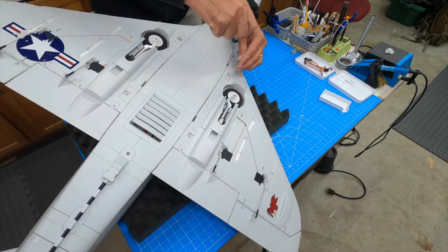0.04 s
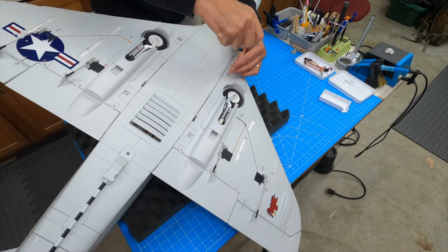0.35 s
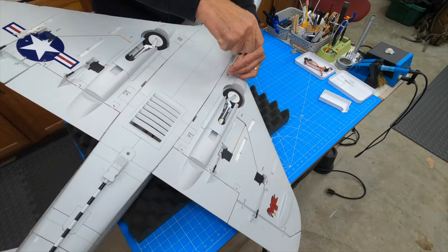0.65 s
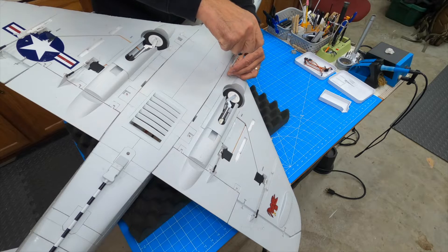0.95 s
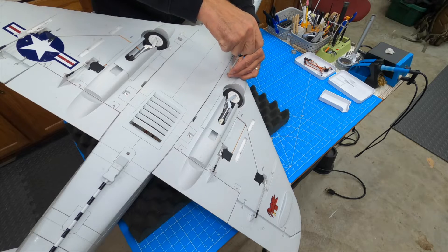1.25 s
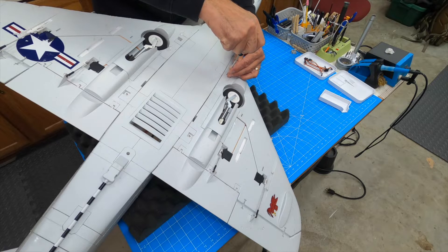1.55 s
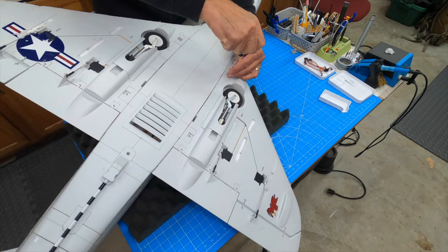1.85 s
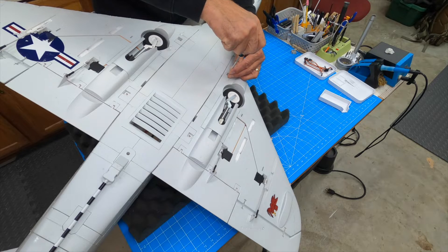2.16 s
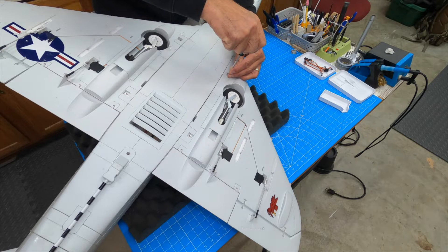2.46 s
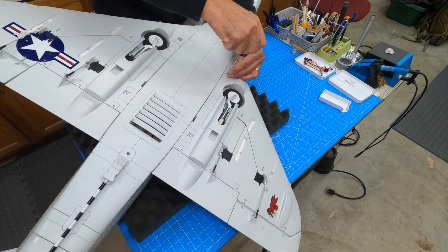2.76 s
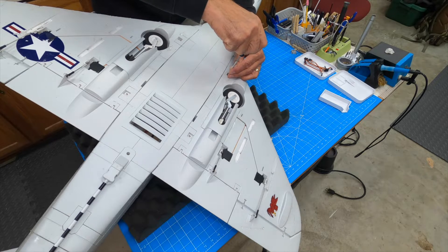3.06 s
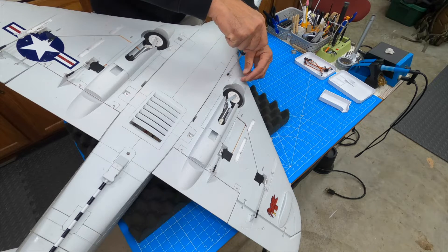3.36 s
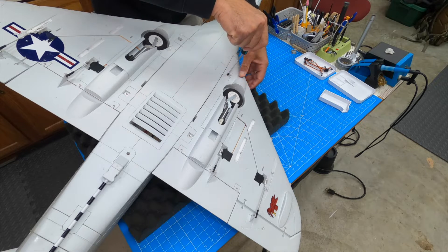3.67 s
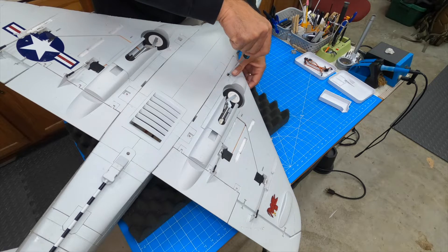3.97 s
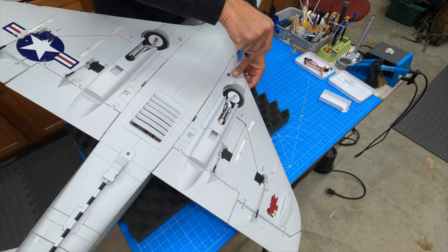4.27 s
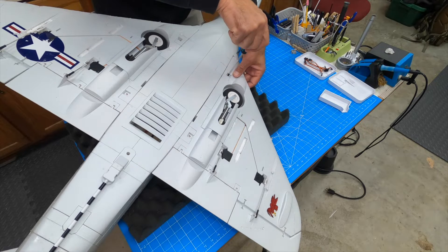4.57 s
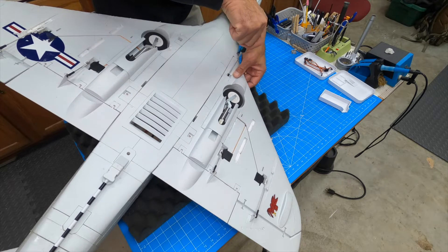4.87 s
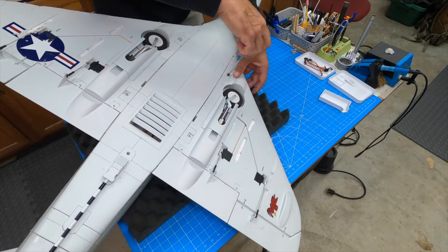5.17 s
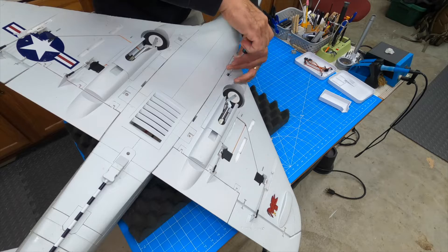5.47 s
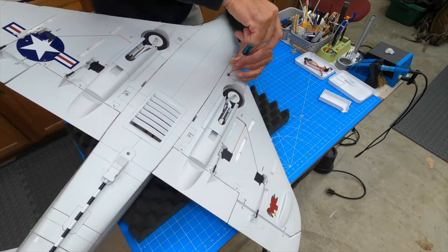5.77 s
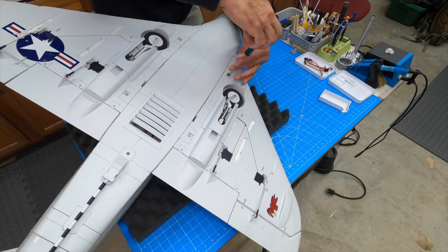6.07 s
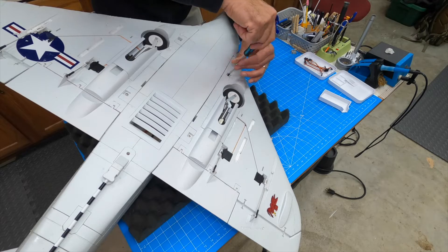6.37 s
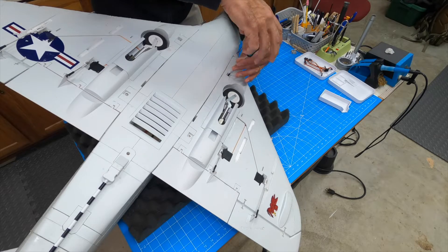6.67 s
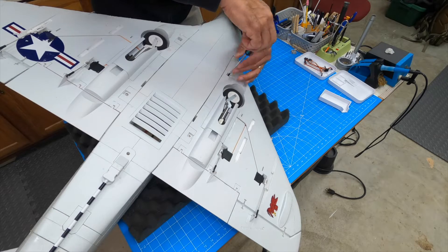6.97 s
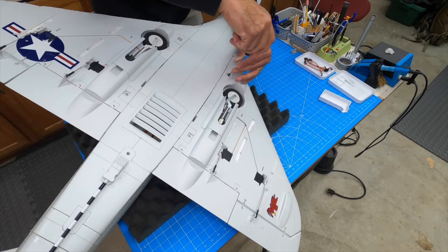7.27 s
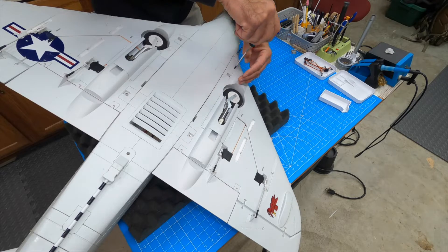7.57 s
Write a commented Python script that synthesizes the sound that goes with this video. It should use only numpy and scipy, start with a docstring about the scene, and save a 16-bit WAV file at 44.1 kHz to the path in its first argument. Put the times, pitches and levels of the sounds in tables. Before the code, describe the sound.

A small screwdriver works a screw into the hollow wing of a foam model aircraft, heard close in a quiet workshop with a faint low rumble. After a soft bump, the tip clicks into the screw head at about 0.8 seconds. Light, irregular ticks, small hollow knocks and faint grinding follow until about 3.2 seconds as the thread sticks and slips. Fingers slide faintly over the handle. Just after 4 seconds come sharper clicks: the bit jumps with a brief metallic tick at 4.3, and the loudest knock, a bright snap, lands at 4.6. From 5 to 6.6 seconds there are only sparse soft ticks, rubs and tiny squeaks. A quick cluster of creaky clicks and knocks comes between 6.9 and 7.2 seconds, then a few lighter ticks and a short scrape of the tip around 7.5.

```python
"""Screwdriver on a foam wing

A small screwdriver works a screw into the wing of a foam model aircraft in a quiet workshop.
The tip clicks into the head, the thread sticks and lets go: each knocks the hollow wing, which rings
briefly; harder contact, brighter knock. The thread grinds in its plastic seat; once the bit jumps
and the steel shaft rings. Between turns the fingers slide over the handle for a new grip."""
import sys
import numpy as np
from scipy import signal
from scipy.fft import rfft, irfft, next_fast_len
from scipy.io import wavfile

SR = 44100
rng = np.random.default_rng(int(sys.argv[2]) if len(sys.argv) > 2 else 0)


def dump(signal):
    """Clip the signal to [-1, 1] and save it as 16-bit WAV at the path in sys.argv[1]."""
    limited = np.clip(np.atleast_2d(signal).T, -1, 1)
    pcm = np.round(limited * 32767).astype(np.int16)
    wavfile.write(sys.argv[1], SR, pcm)


N = 336042
TIME_S = np.arange(N) / SR
RING_SAMPLES, LEAD_SAMPLES = 12000, 1024

# thread slips: t/s, strength/dB, contact cut-off/Hz, relative seat knock/dB
SLIPS = [(1.409, -49, 1070.0, 5.5), (1.501, -49.5, 950, 3.5), (1.554, -50.5, 2200, -20),
         (1.666, -58.5, 880.0, 4.5), (1.773, -46.5, 526, 0.5), (2.169, -45.5, 2580, -9),
         (2.37, -44, 1070, -11), (2.573, -46.5, 3100, 2.5), (2.695, -53.5, 237, 8.5),
         (2.959, -44.5, 470.0, -2), (3.192, -37.5, 890, 15.5), (4.377, -24.5, 1160, 4.5),
         (4.589, -16, 4250, 9), (4.777, -52, 850, -0.0), (4.9, -62, 690.0, 9), (5.036, -52, 2270.0, 2.5),
         (5.569, -43.5, 841, -9.5), (6.371, -52.5, 1196, 17), (6.468, -48.5, 480.0, -11),
         (6.8988, -25, 1080, -8), (6.946, -39.5, 2180, 4), (6.969, -30.0, 780.0, -7.0),
         (6.996, -32.5, 1020.0, -2.5), (7.04, -33, 930.0, 2.5), (7.12, -25, 660.0, -17),
         (7.147, -36, 536, -12.0), (7.324, -43, 915, -2), (7.358, -44.5, 1810, 3),
         (7.433, -46.5, 1640.0, -3.5)]
# slip colour at hardest contact: f/Hz, gain/dB
SLIP_TONE = [(335, -0.5), (594, -5), (1095, -12.5), (2830, -12), (7070, -17.5)]
# tip drops into the screw head: t/s, strength/dB, contact cut-off/Hz
CLICKS = [(0.766, -30.0, 765), (0.91, -41.0, 2250), (1.231, -37, 2350), (1.361, -37, 574),
          (2.272, -37, 2880), (2.411, -38, 1910), (2.615, -39.0, 1230), (3.021, -29.5, 1950),
          (4.102, -31.5, 2120), (4.2775, -29, 4850), (6.63, -38, 940), (7.076, -24.5, 2260)]
# click colour at hardest contact: f/Hz, gain/dB
CLICK_TONE = [(335, 0.5), (594, -4.5), (1095, -6), (2830, -7), (7070, 1.5)]
# bit jumps in the head: t/s, strength/dB
CAM_OUTS = [(4.2768, -21), (4.2791, -26)]
# thread grinds in the plastic: t/s, strength/dB, sigma/s
GRINDS = [(1.165, -59, 0.023), (1.508, -52.5, 0.042), (1.825, -56.5, 0.095), (2.41, -41, 0.018),
          (3.178, -33, .002), (4.369, -31, 0.0049), (5.22, -64.5, 0.098), (6.359, -49, .017),
          (6.701, -57.5, 0.018), (6.832, -57, 0.054), (6.887, -43, 0.0054), (7.009, -38, 0.0066),
          (7.062, -41.5, 0.0043)]
# wing's thump, knock, clack, tick and snap bands: low/Hz, high/Hz
WING_BANDS_HZ = [(250, 450), (470, 750), (800, 1500), (2000, 4000), (5000, 10000)]
# hollow wing: f/Hz, level/dB, t60/s
WING_MODES = [(159, -7, 0.25), (248.5, -10, .15), (331.7, 7.5, 0.16), (389.5, 3.5, 0.14),
              (420.8, 3.5, 0.076), (468.2, -13.5, 0.22), (559.6, -0.5, 0.059), (603, -10, 0.079),
              (660, -5, .07), (764, -15, 0.12), (813.4, -18.5, 0.12), (935, -18, 0.13),
              (1008.7, -14.5, .11), (1039.5, -6.5, 0.11), (1091.6, -16, 0.078), (1219, -23.5, 0.055),
              (1358, -18, 0.082), (1954, -22.5, .1), (2140, -34, 0.11), (2415, -19, 0.094),
              (2640, -19.5, 0.071)]
# dense, quickly damped foam response: f/Hz, gain/dB
FOAM_TONE = [(60, -13), (140, -4.5), (235, -18.5), (350, 1.5), (600, -1), (780, -3), (1080, -2.5),
             (1350, -8), (1700, -11), (2450, -15.5), (3000, -18), (4500, -14), (6400, -13.5), (9000, -21),
             (15000, -31.5)]
# plastic seat, damped by the foam: f/Hz, level/dB, t60/s
SEAT_MODES = [(406.6, -0.5, 0.051), (556.4, -3, .05)]
# screw resonance, moving with its seat: t/s, f/Hz
SCREW_RESONANCE = [(0.9, 2400), (1.3, 2470), (4.4, 2630), (4.59, 4097), (5.1, 3397), (7.4, 3400)]
# shaft and screw: f/Hz, level/dB, t60/s
STEEL_MODES = [(760.5, -9.5, 0.13), (1220, -14, 0.14), (1955, -9, .05), (2080, -14, 0.031),
               (2391, 6, 0.026), (2678, -2.5, .012), (3900, -15.5, 0.052), (4694, -16.5, 0.03),
               (5930, -0.5, 0.017), (6540, -2.5, 0.026), (6420, -2, 0.0093), (7100, -7, 0.0081),
               (9090, -10.5, 0.013), (10240, -13, 0.0094), (11300, -10, .008)]
# fingers slide on the handle: t/s, strength/dB, sigma/s
RUBS = [(3.387, -71, 0.013), (3.465, -61.5, 0.011), (3.713, -64, 0.013), (4.049, -69, 0.049),
        (5.175, -66.5, 0.024), (5.215, -57, 0.013), (5.289, -62.5, 0.012), (5.714, -73, 0.047),
        (6.067, -71.5, .012), (6.361, -70, 0.027), (6.804, -77, 0.031)]
# fingers rub and tap on the handle, short rough scrapes and ticks: t/s, level/dB, sigma/s
SCRAPES = [(4.271, -60.5, 0.016), (4.507, -63.5, 0.044), (7.487, -51, 0.0071), (7.544, -47.5, 0.002),
           (7.564, -68.5, .031)]
# tip squeaks in the head: t/s, level/dB, sigma/s
SQUEAKS = [(6.061, -74, .02), (6.247, -77.5, 0.014), (6.569, -68.5, 0.0073), (6.606, -74, 0.017)]
# wing nudges the bench: t/s, level/dB, sigma/s, f/Hz
BUMPS = [(0.267, -51, 0.009, 92), (0.418, -56.5, 0.034, 100), (4.605, -40.5, .008, 55.17)]
# workshop reverberation: f/Hz, t60/s
ROOM_DECAY = [(150, 0.15), (500, 0.37), (1200, 0.19), (4000, 0.19), (12000, 0.17)]
# colour of the diffuse sound: f/Hz, gain/dB
ROOM_TONE = [(150, 4.5), (400, -3.5), (1100, 0), (2500, 3.5), (6000, -7.5), (12000, 3)]
# still workshop air: f/Hz, relative density/dB
AIR_SPECTRUM = [(13, -37), (22, -21.5), (146, -6), (240, -17.5), (316, -8.5), (490, -19), (532, -19.5),
                (645, -16.5), (849, -27), (1030, -25), (1120, -35.5), (1250, -26), (1350, -28.5),
                (3440, -34), (15600, -36)]
# distant motor: f/Hz, level/dB
MOTOR_HUM = [(149, -77), (542, -82.5)]


def slips(gain_db, top_db, seat_db=4.5, light_slip_db=-49.5, light_creep_db=4, creep_db_per_db=0.18):
    """The thread lets go and knocks its seat: light slips creep, strong ones break free at once."""
    tone_db = gain_db + at_hz(SLIP_TONE, band_centres_hz())
    blows = [(s, db, hz, light_creep_db - creep_db_per_db * (db - light_slip_db))
             for s, db, hz, _ in SLIPS]
    out = wing_blows(blows, tone_db, top_db, rolloff=3.23)
    knock = band(ringing(SEAT_MODES).sum(axis=0), low_hz=272, high_hz=1100)
    for s, db, _, knock_db in SLIPS:
        add(out, from_db(db + knock_db + seat_db) * knock, round(s * SR))
    return out


def clicks(gain_db, top_db, creep_db=-27, rolloff=5.57, shaft_db=5.5, shaft_onset_hz=3553, room_db=-5):
    """The tip lands on the screw with hardly any creep; hard contact also rings the shaft."""
    tone_db = gain_db + at_hz(CLICK_TONE, band_centres_hz())
    wing = wing_blows([(s, db, hz, creep_db) for s, db, hz in CLICKS], tone_db, top_db, rolloff)
    shaft, steel = np.zeros(N), ringing(STEEL_MODES)
    mode_signs = rng.choice([-1, 1], (len(CLICKS), len(STEEL_MODES)))
    for (s, db, contact_hz), signs in zip(CLICKS, mode_signs):
        loss_db = contact_loss_db(shaft_onset_hz, contact_hz, rolloff)
        ring = signal.sosfilt(signal.butter(1, contact_hz, fs=SR, output="sos"), signs @ steel)
        add(shaft, from_db(db + shaft_db - loss_db) * ring, round(s * SR))
    return wing + with_room(shaft, room_db)


def cam_out(room_db):
    """The bit jumps and strikes steel on steel; the shaft rings for an instant."""
    out = np.zeros(N)
    ring = rng.choice([-1, 1], len(STEEL_MODES)) @ ringing(STEEL_MODES)
    ring = with_room(ring, room_db)
    for s, db in CAM_OUTS:
        add(out, from_db(db) * ring, round(s * SR))
    return out


def grinding(creeps_per_s):
    """Under torque the thread creeps in many small uneven steps that shake the wing."""
    pressure = sum(from_db(db) * bell(TIME_S - s, sigma_s) for s, db, sigma_s in GRINDS)
    creeps = rms_one(creep_pulses(N, creeps_per_s))
    response = wing_response(ringing(WING_MODES, rise_s=0.0036), room_tails(1)[0], screw_hz=3420)
    response = colour(response, [(400, 1.5), (1000, 0.5), (2400, -6.5), (3500, -18), (7000, -36.5)])
    return signal.fftconvolve(creeps * pressure, energy_one(response))[:N]


def stick_slip(creep_db, creeps_per_s=1100, swell_s=0.0024, settle_s=0.0051):
    """Creeps swell as torque builds, the contact lets go, more creeps follow as it settles."""
    t = np.arange(-LEAD_SAMPLES, LEAD_SAMPLES) / SR
    envelope = np.exp(np.minimum(t / swell_s, -t / settle_s))
    creeps = energy_one(creep_pulses(len(t), creeps_per_s) * envelope)
    creeps = colour(creeps, [(600, 1), (2500, -2.5), (8000, -8.5)])
    release = signal.unit_impulse(len(t), LEAD_SAMPLES)
    return from_db(creep_db) * creeps + release


def creep_pulses(samples, creeps_per_s):
    """Tiny friction steps, random in time and size."""
    return rng.standard_normal(samples) * (rng.random(samples) < creeps_per_s / SR)


def contact_loss_db(hz, contact_hz, rolloff):
    """Soft contact loses treble: above the cut-off, power falls as f ** -rolloff."""
    return 10 * np.log10(1 + (hz / contact_hz) ** rolloff)


def wing_blows(blows, tone_db, top_db, rolloff):
    """Each blow shakes the wing; its strength and contact cut-off set the level in each band."""
    out, rings, centres_hz = np.zeros(N), ringing(WING_MODES, rise_s=0.0015), band_centres_hz()
    for (s, db, contact_hz, creep_db), tail in zip(blows, room_tails(len(blows))):
        screw_hz = np.interp(s, *np.transpose(SCREW_RESONANCE))
        response = wing_response(rings, tail, screw_hz)
        hit = signal.fftconvolve(stick_slip(creep_db), response)[:RING_SAMPLES]
        # band levels count over the 23 ms after release
        attacks = [band(hit[:2 * LEAD_SAMPLES], *edges_hz, order=3)[LEAD_SAMPLES:]
                   for edges_hz in WING_BANDS_HZ]
        attack_db = 20 * np.log10(np.std(attacks, axis=1))
        gains_db = db + tone_db - contact_loss_db(centres_hz, contact_hz, rolloff) - attack_db
        spectrum = [*zip(centres_hz, gains_db), (15000, gains_db[-1] + top_db)]
        add(out, colour(hit, spectrum), round(s * SR) - LEAD_SAMPLES)
    return out


def wing_response(rings, tail, screw_hz, screw_db=8, modes_db=-31, scatter_db=3, scatter_s=0.003):
    """A crack, its scatter in foam and room, the screw's resonance and the wing's modes."""
    t = np.arange(RING_SAMPLES) / SR
    scatter = energy_one(rng.standard_normal(len(t)) * np.exp(-t / scatter_s))
    foam = colour(signal.unit_impulse(len(t)) + from_db(scatter_db) * scatter + tail, FOAM_TONE)
    screw = signal.lfilter(*signal.iirpeak(screw_hz, Q=7, fs=SR), foam)
    spread_db = rng.normal(0, 1.34, len(rings))
    return foam + from_db(screw_db) * screw + from_db(modes_db + spread_db) @ rings


def radiated(x, corner_hz=235):
    """The light foam panel hardly radiates long waves."""
    return signal.sosfilt(signal.butter(4, corner_hz, "high", fs=SR, output="sos"), x)


def ringing(modes, rise_s=0.0001):
    """Decaying sines, one row a mode; they start in phase and take a moment to fill the body."""
    t = np.arange(RING_SAMPLES) / SR
    rings = [from_db(db - 60 * t / t60_s) * np.sin(2 * np.pi * hz * t) for hz, db, t60_s in modes]
    return np.array(rings) * (1 - np.exp(-t / rise_s))


def handling(room_db):
    """Skin hisses over the handle, fingers scrape and tap on it, the tip squeaks, the wing bumps softly."""
    rubs = sum(stroke(*rub, low_hz=3740, high_hz=15260, order=3) for rub in RUBS)
    rubs = colour(rubs, [(4000, 2.5), (10000, 0), (15000, -3.5)])
    scrapes = sum(stroke(*scrape, low_hz=2374, high_hz=7400, rough_db=5.5) for scrape in SCRAPES)
    squeaks = sum(stroke(*squeak, low_hz=3190, high_hz=3720) for squeak in SQUEAKS)
    bumps = sum(stroke(s, db, sigma_s, hz / 1.5, hz * 1.2, rough_db=-0.5) for s, db, sigma_s, hz in BUMPS)
    return with_room(rubs + scrapes + squeaks + bumps, room_db)


def stroke(s, db, sigma_s, low_hz, high_hz, order=2, rough_db=0, catch_s=0.00073):
    """A bell-shaped swell of friction noise; rough_db sets how unevenly it catches."""
    out, middle = np.zeros(N), RING_SAMPLES // 2
    t = np.arange(-middle, middle) / SR
    catches = np.interp((t - t[0]) / catch_s, np.arange(1024), rng.standard_normal(1024))
    friction = rng.standard_normal(len(t)) * from_db(rough_db * catches)
    friction = rms_one(band(friction, low_hz, high_hz, order))
    add(out, from_db(db) * friction * bell(t, sigma_s), round(s * SR) - middle)
    return out


def room_tails(count, build_s=0.003):
    """Diffuse reflections, one row a sound: they build up and die band by band."""
    t, edges_hz = np.arange(RING_SAMPLES) / SR, np.geomspace(70, 18000, num=9)
    out = 0
    for low_hz, high_hz in zip(edges_hz, edges_hz[1:]):
        hz = np.sqrt(low_hz * high_hz)
        fade = energy_one(from_db(-60 * t / at_hz(ROOM_DECAY, hz)) * (1 - np.exp(-t / build_s)))
        noise = band(rng.standard_normal((count, len(t))), low_hz, high_hz)
        out = out + noise * fade * from_db(at_hz(ROOM_TONE, hz))
    return out


def with_room(x, room_db):
    """Direct sound plus workshop reflections."""
    return x + from_db(room_db) * signal.fftconvolve(x, room_tails(1)[0])[:len(x)]


def workshop(air_db):
    """Low room rumble, faint hiss and a distant motor's hum."""
    air = rms_one(colour(rng.standard_normal(N), AIR_SPECTRUM))
    hum = sum(from_db(db) * np.sqrt(2) * np.sin(2 * np.pi * hz * TIME_S) for hz, db in MOTOR_HUM)
    return from_db(air_db) * air + hum


def from_db(db):
    return 10 ** (np.asarray(db) / 20)


def rms_one(x):
    return x / np.sqrt(np.mean(x ** 2) + 1e-20)


def energy_one(x):
    return rms_one(x) / np.sqrt(len(x))


def bell(t, sigma_s):
    return np.exp(-0.5 * (t / sigma_s) ** 2)


def band_centres_hz():
    return np.sqrt(np.prod(WING_BANDS_HZ, axis=1))


def at_hz(points, hz):
    """Read a table (f/Hz, value) on a log-frequency axis."""
    knots_hz, values = np.transpose(points)
    return np.interp(np.log(hz + 1e-3), np.log(knots_hz), values)


def colour(x, spectrum):
    """Minimum-phase filter from a table (f/Hz, gain/dB)."""
    size = 2 * next_fast_len(len(x))
    hz = np.arange(size // 2 + 1) * SR / size
    cepstrum = irfft(np.log(from_db(at_hz(spectrum, hz))))
    cepstrum[1:size // 2] *= 2
    cepstrum[size // 2 + 1:] = 0
    return irfft(rfft(x, size) * np.exp(rfft(cepstrum)))[:len(x)]


def band(x, low_hz, high_hz, order=2):
    return signal.sosfilt(signal.butter(order, [low_hz, high_hz], "band", fs=SR, output="sos"), x)


def add(out, x, start):
    out[start:start + len(x)] += x[:N - start]


def scene():
    """Screw, wing, hand and room in mono."""
    wing = clicks(gain_db=-1.47, top_db=-4) + slips(gain_db=0.2, top_db=3.5) + grinding(creeps_per_s=470)
    return (radiated(wing) + cam_out(room_db=-9.5) + handling(room_db=-5.5) + workshop(air_db=-66.5))[None]


def record(dry):
    """Clip at full scale, then a steep low-pass."""
    stop_db, stop_hz = 80, 16500
    return signal.sosfilt(signal.cheby2(18, stop_db, stop_hz, fs=SR, output="sos"), np.clip(dry, -1, 1))


dry = scene()
out = record(dry)
dump(out)
```